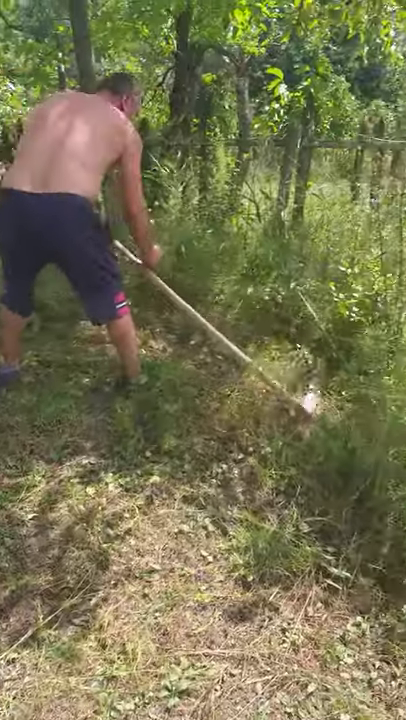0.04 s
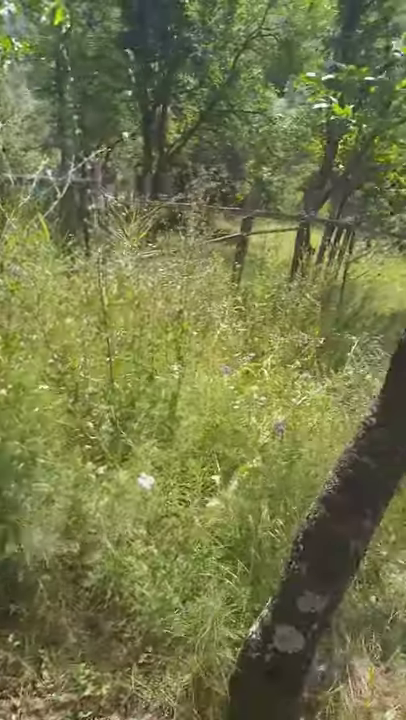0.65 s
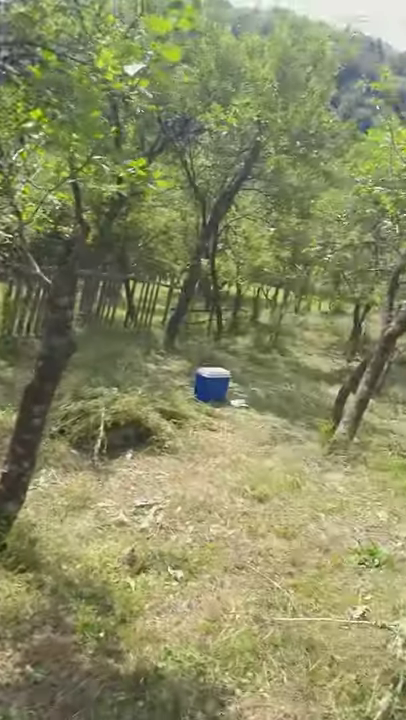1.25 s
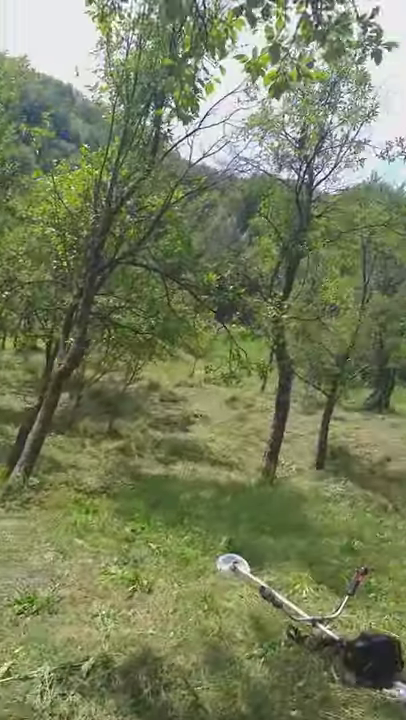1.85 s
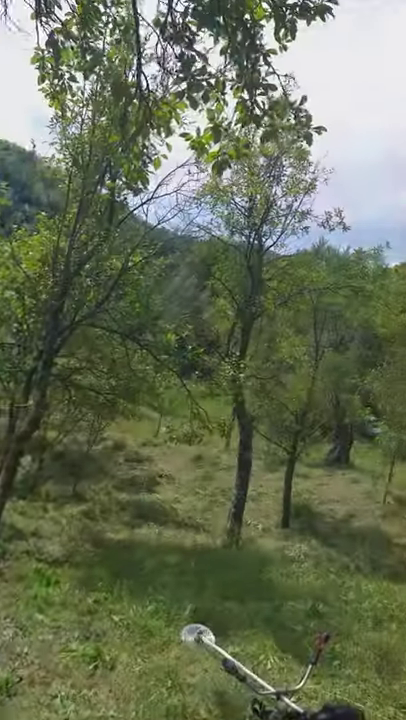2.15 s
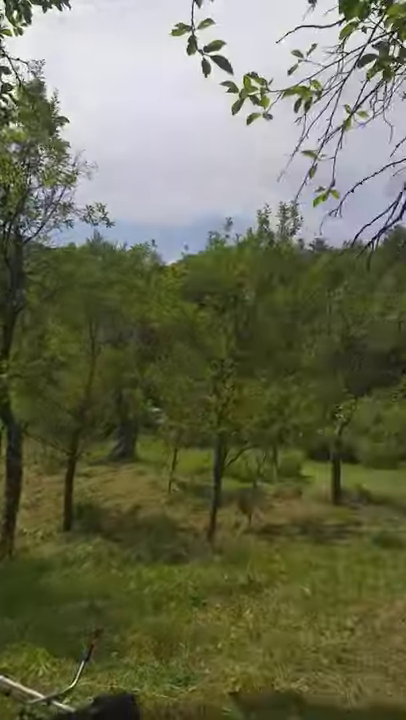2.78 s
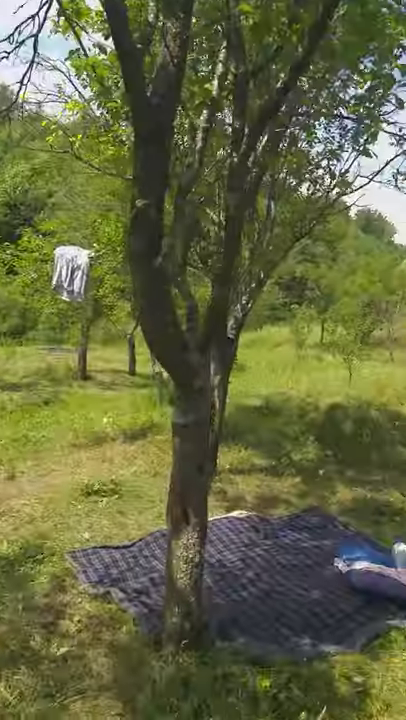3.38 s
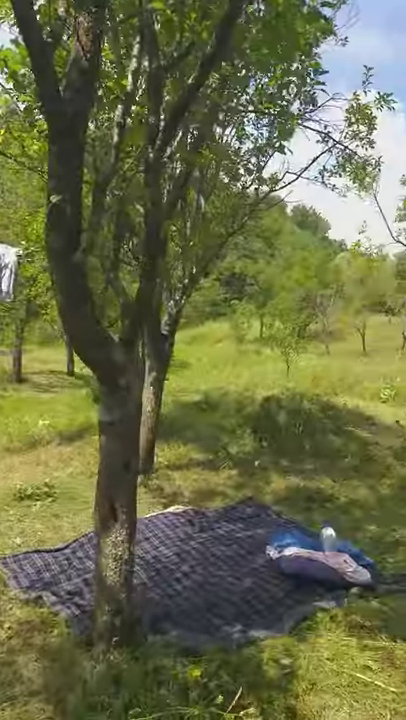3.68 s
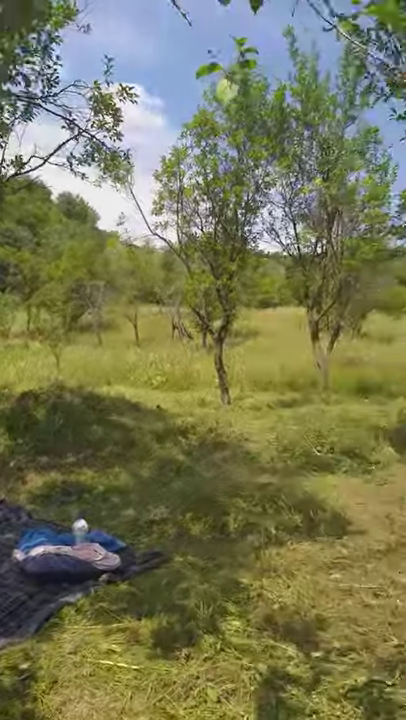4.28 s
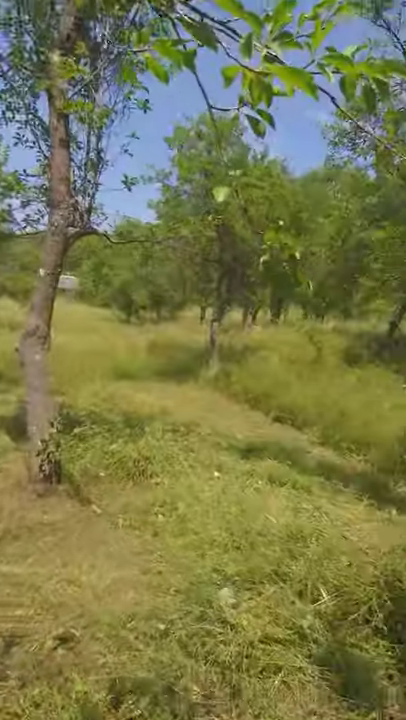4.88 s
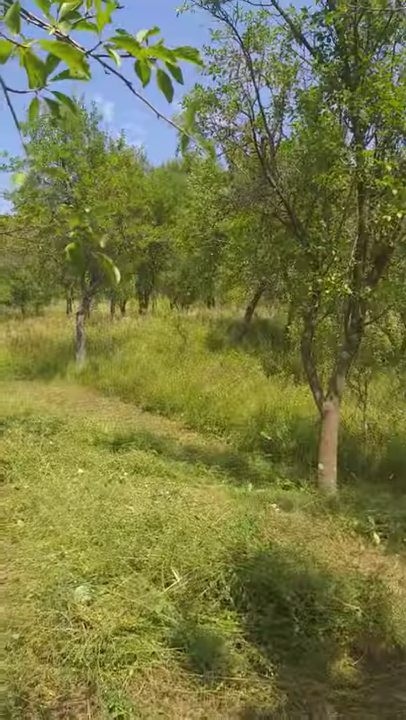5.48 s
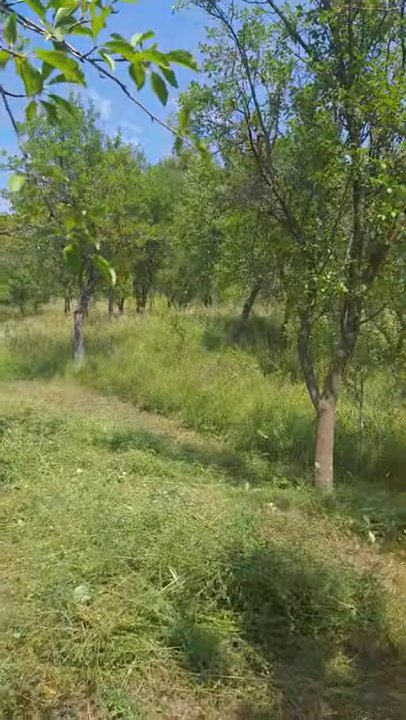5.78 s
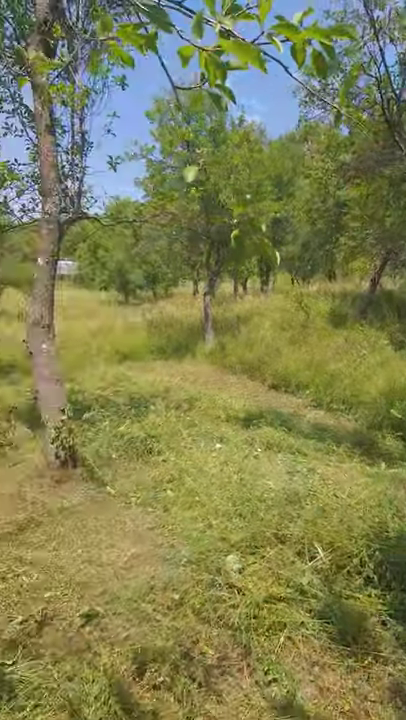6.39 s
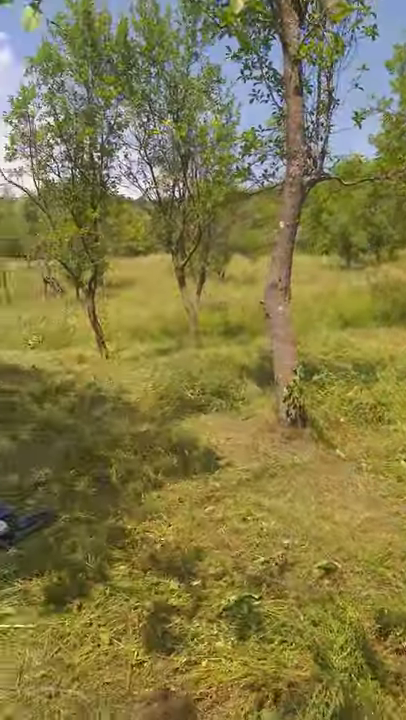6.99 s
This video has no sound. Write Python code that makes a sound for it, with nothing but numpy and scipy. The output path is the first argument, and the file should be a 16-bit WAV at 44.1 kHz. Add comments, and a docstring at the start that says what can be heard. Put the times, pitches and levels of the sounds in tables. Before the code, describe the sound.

Out in an orchard, a nearby scythe opens with a brief steel ring while a faint, far engine dies away. The blade keeps sweeping through grass about every second and a half to two seconds, ripping stems, cracking dry stalks and giving small pings. Later strokes are softer. A thin sizzle of grasshoppers lies underneath, and low wind bumps hit the microphone now and then, with the biggest shortly before the end.

```python
"""A scythe mows tall orchard grass, close up: each sweep brushes leaves, tears stems, crunches hay
and sets the thin steel blade ringing. Tufts give way, dry stalks snap, brief pings ring out, and short
echoes off soil and trunks shift as the listener moves. Behind it, wind puffs on the microphone,
grasshoppers sizzle, and a far two-stroke engine winds down in the first second."""
import sys
import numpy as np
from scipy import signal
from scipy.fft import rfft, irfft
from scipy.io import wavfile
from scipy.ndimage import uniform_filter1d

SR = 44100
rng = np.random.default_rng(int(sys.argv[2]) if len(sys.argv) > 2 else 0)


def digitize_waveform(pressure):
    """Quantize a signal to 16-bit integers and store it at the path in sys.argv[1].

    Rows of a 2-D input are taken as channels; values are limited to [-1, 1].
    """
    field = np.atleast_2d(pressure).T
    bounded = np.clip(field, -1, 1)
    quanta = np.round(bounded * 32767).astype(np.int16)
    wavfile.write(sys.argv[1], SR, quanta)


N = 310464
T = np.arange(N) / SR
SLOW_T = T[::32]  # control rate for the envelopes

# EQ curves, each scaled to rms 1 in use: f/Hz, level/dB
MEADOW_EQ = [(30, -10), (100, -3), (300, -11.5), (1000, -12), (2000, -15), (5500, -29), (7000, -3),
             (8400, 6), (9400, -25.5), (12500, -6), (15800, -14)]  # still air, with grasshoppers near 8 kHz
ENGINE_EQ = [(60, -10.5), (120, 5), (240, -13), (450, -31), (580, 6.5), (720, -3), (850, -1), (960, 3.5),
             (1100, -34), (1450, -4.5), (3000, -31)]  # hollow exhaust drone
WIND_EQ = [(15, -38.5), (28, -26), (45, -8), (85, 2.5), (140, -1.5), (220, -18), (350, -25.5), (700, -55)]  # low rumble on the microphone
HAY_EQ = [(100, -23), (230, -8.5), (330, -10.5), (460, -11), (640, -5), (850, 1), (1150, -2), (1500, -17),
          (2500, -29)]  # dull crunch of crushed hay
STEM_EQ = [(700, -58.5), (1200, -3), (1600, 4), (1850, 8.5), (2150, 6.5), (2500, 0.5), (3500, 3.5),
           (6000, -44)]  # midrange rip of stems
LEAF_EQ = [(1500, -24.5), (2600, -6), (3500, 5), (4400, 0.5), (5300, 1.5), (6200, -5), (8000, -27)]  # bright rustle of leaves
SEED_EQ = [(5000, -32.5), (6400, -1.5), (7300, 6), (8500, 4), (9600, -7), (11000, -25.5)]  # hiss of seed heads
TIP_EQ = [(8500, -35), (10000, -10.5), (11500, -2), (12600, -0.5), (14500, -4.5), (15700, -4)]  # airy fizz of the finest tips
# the far engine winds down: t/s, firing rate/Hz, level/dB
ENGINE_RUNDOWN = [(0, 120.5, -56.5), (.15, 121.7, -60.5), (.3, 113.9, -65), (.45, 104.8, -64),
                  (.6, 101.7, -69), (.9, 99, -84.5), (1.3, 103.8, -112)]
# gusts on the microphone: centre t/s, half length/s, level/dB
WIND_GUSTS = [(0.174, 0.085, -50.5), (0.447, 0.077, -59), (0.886, 0.18, -76), (1.596, 0.18, -52.5),
              (2.39, 0.52, -55), (3.57, 0.054, -57), (4.05, 0.061, -67), (5.45, 0.1, -59),
              (6.05, 0.1, -49.5), (6.299, 0.043, -40), (6.88, 0.028, -62)]
# single eddies hit the microphone port: t/s, level/dB, f/Hz
WIND_EDDIES = [(0.176, -39, 90), (1.587, -38, 121), (3.76, -45, 79.5), (5.401, -43, 85),
               (5.452, -36.5, 100), (5.486, -40.5, 91), (6.211, -37, 100), (6.267, -32, 146),
               (6.279, -35, 128), (6.306, -20.5, 179), (6.318, -30, 100)]
# dry stalks snap: t/s, level/dB, f/Hz
STALK_SNAPS = [(0.201, -22, 1740), (.6748, -31, 5000), (0.862, -10, 2270), (1.353, -25, 5600),
               (1.534, -22.5, 1730), (1.6105, -21, 1820), (2.5923, -21, 1990), (2.7099, -14, 2054),
               (3.753, -28, 2010), (4.1665, -46.5, 1870), (5.114, -19, 1710), (5.351, -25, 3670)]
# short pings and clinks, the low, longer ones from the steel blade: t/s, level/dB, f/Hz, t60/s
PINGS_AND_CLINKS = [(.675, -27.5, 5050, 0.081), (1.936, -25, 3930, 0.1), (3.486, -35.5, 1432, 0.3),
                    (3.649, -41, 1694, 0.43), (4.259, -55, 1310, 0.34)]
# tufts give way: t/s, level/dB, f/Hz, decay time constant/s
TUFT_TEARS = [(0.05, -29, 2400, 0.019), (.088, -32, 2370, 0.0096), (0.159, -28, 7500, 0.016),
              (0.197, -26.5, 2140, 0.019), (.674, -28, 5000, 0.026), (.764, -25, 2500, 0.08),
              (0.861, -15, 2100, 0.022), (0.916, -18, 2180, 0.038), (0.957, -20.5, 4080, 0.0062),
              (1.006, -26, 1200, 0.016), (1.41, -30, 7160, 0.019), (1.537, -27.5, 1620, 0.0041),
              (1.609, -29, 2000, .004), (1.881, -23, 1620, 0.017), (1.935, -30, 3850, 0.012),
              (2.473, -35.5, 2340, 0.011), (2.579, -14, 2080, 0.0047), (2.591, -14, 1990, 0.0058),
              (2.65, -18.5, 1920, 0.014), (2.709, -12, 2130, 0.0075), (2.787, -17, 1800, 0.012),
              (3.648, -38, 1550, 0.065), (3.864, -28.5, 2120, 0.031), (4.258, -56, 1890, 0.11),
              (4.334, -38, 1980, 0.037), (4.431, -26.5, 2780, 0.035), (4.433, -31, 7300, 0.018),
              (4.65, -33, 3120, 0.068), (5.256, -47, 1820, 0.025), (5.976, -25, 1620, 0.0095),
              (6.022, -44, 835, 0.0062)]
# scraping swishes: centre t/s, half length/s, centre f/Hz, level/dB
BLADE_SWISHES = [(0.98, 0.04, 1490, -58), (2.813, .04, 1714, -31.5), (3.489, .02, 1484, -38),
                 (4.752, 0.054, 1354, -45), (6, 0.039, 1000, -36), (6.66, .03, 880, -73)]
# modes of the steel blade: f/Hz, level/dB, t60/s
BLADE_MODES = [(1490, -31, 0.2), (1688, -10, 0.17), (1940, -2.5, 0.12), (2121, 0, 0.11), (2400, -5, 0.13),
               (2485, -14.5, 0.04), (2830, -10.5, 0.079), (3600, -20, .1), (3870, -6.5, 0.068),
               (4830, -11.5, .08)]
# the blade knocks against something hard: t/s, level/dB
BLADE_KNOCKS = [(3.485, -41.5), (3.866, -51.5)]
# the blade bites into thick clumps near the ground: t/s, stem level/dB, hay level/dB
CLUMP_BITES = [(0.205, -38.5, -50.5), (0.959, -31, -37.5), (1.56, -50, -47.5), (2.71, -29.5, -42),
               (2.82, -44, -42), (3.49, -39.5, -52.5), (3.67, -43.5, -56), (3.91, -43.5, -61.5),
               (4.41, -48, -48), (4.55, -60, -55), (4.72, -40.5, -56), (5.27, -65.5, -61.5),
               (6.023, -34.5, -36.5), (6.65, -54.5, -56.5), (6.8, -45, -85), (6.87, -50.5, -83)]
# cuts about every 1.7 s, drags back between them, and second pushes where a stroke catches:
# t/s, attack/s, hold/s, leaf level/dB, then offsets from it: stems/dB, seeds/dB, tips/dB, ring/dB
SCYTHE_STROKES = [(-.05, 0.1, 0.15, -39.5, -27, -5, -6, 1), (0.363, 0.43, 0.26, -34.5, -1.5, -2, -0.5, -5),
                  (0.974, 0.69, .48, -40.5, -2, -3.5, -2.5, -16.5),
                  (2.436, 0.089, .005, -42.5, -2, -5.5, -1, -15),
                  (2.561, 0.033, 0.25, -31, -0.5, -6, 1.5, -14.5),
                  (3.025, 0.23, 0.34, -46.5, -6.5, -0.5, -3, -17),
                  (3.546, 0.16, 0.08, -43.5, -13, -2, -4, -7),
                  (4.316, 0.021, 0.25, -43.5, 1.5, -2, -7, -17),
                  (4.343, 0.41, .11, -42, -11, 3.5, 1.5, -27), (4.871, 0.41, 0.22, -53, -5.5, 0, -3.5, -16),
                  (5.883, 0.067, 0.15, -40.5, -7.5, -2.5, -2.5, -23.5),
                  (6.124, .54, .26, -51.5, -16, 3, -1, -11)]


def undb(db):
    """Decibels to gain."""
    return np.exp(np.asarray(db) * (np.log(10) / 20))


def unit(x):
    """Scale to rms 1."""
    return x / np.sqrt(np.mean(x ** 2))


def colour(x, eq):
    """Minimum-phase EQ through (f/Hz, level/dB) points; the result has rms 1."""
    hz, db = np.transpose(eq)
    bin_hz = np.arange(N // 2 + 1) * SR / N
    log_gain = np.log(undb(np.interp(np.log(bin_hz + 1), np.log(hz), db)))
    cepstrum = irfft(log_gain, N)
    cepstrum[1:N // 2] *= 2
    cepstrum[N // 2 + 1:] = 0
    return unit(irfft(rfft(x) * np.exp(rfft(cepstrum)), N))


def resonance(x, hz, width_hz):
    """Two-pole band-pass, gain 1 at the centre."""
    return signal.lfilter(*signal.iirpeak(hz, hz / min(width_hz, SR / 4), fs=SR), x)


def walk(rate):
    """Random modulator that glides to a new value every 1 / rate s; rms 1."""
    hold = max(int(SR / rate), 1)
    return unit(uniform_filter1d(rng.standard_normal(N)[np.arange(N) // hold], hold))


def crackle(rate, spread_db):
    """Tiny random breaks, about rate a second, most weak and a few strong; rms 1."""
    size = undb(spread_db * np.minimum(rng.standard_exponential(N), 5))
    return unit((rng.random(N) < rate / SR) * size * rng.choice([-1, 1], N))


def add(out, s, sound):
    """Mix a short sound in at time s."""
    start = max(int(s * SR), 0)
    out[start:start + len(sound)] += sound[:N - start]


def power_sum(gains):
    """Add control-rate envelopes in power and bring them up to audio rate."""
    return np.interp(T, SLOW_T, np.sqrt(sum(g ** 2 for g in gains)))


def swells(times, levels_db, rise_db_per_s=292, fall_db_per_s=202):
    """Envelope that climbs to each level at its time, then dies away."""
    return power_sum(
        undb(db - rise_db_per_s * np.maximum(s - SLOW_T, 0) - fall_db_per_s * np.maximum(SLOW_T - s, 0))
        for s, db in zip(times, levels_db))


def mowing(levels_db, settle_db_per_s):
    """One layer's envelope over all strokes: the blade speeds up evenly, sweeps on, the sound settles."""
    gains = []
    for (s, attack_s, hold_s, *_), db in zip(SCYTHE_STROKES, levels_db):
        speed = np.clip((SLOW_T - s) / attack_s, 0, 1)
        settling_s = np.maximum(SLOW_T - s - attack_s - hold_s, 0)
        gains.append(speed ** 1.88 * undb(db - settle_db_per_s * settling_s))
    return power_sum(gains)


def meadow(level_db=-62.5):
    """The bed: still air and a faintly flickering chorus of grasshoppers."""
    return colour(rng.standard_normal(N), MEADOW_EQ) * undb(level_db + 0.43 * walk(36))


def engine():
    """One exhaust pulse per turn, slowing as the throttle closes; the air makes it waver."""
    times, hz, db = np.transpose(ENGINE_RUNDOWN)
    firing_hz = np.interp(T, times, hz) * (1 + 0.0033 * walk(27))
    pulses = np.diff(np.floor(np.cumsum(firing_hz) / SR), prepend=0)
    return colour(pulses - pulses.mean(), ENGINE_EQ) * undb(np.interp(T, times, db) + walk(24))


def wind(breeze_db=-78, eddy_cycles=0.53):
    """Uneven low buffeting, with single eddies that push and pull on the microphone port."""
    gusts = sum(undb(db) * np.exp(-((T - s) / half_s) ** 2) for s, half_s, db in WIND_GUSTS)
    buffeting = unit(colour(rng.standard_normal(N), WIND_EQ) * undb(6.2 * np.tanh(walk(36))))
    out = buffeting * (undb(breeze_db) + gusts)
    for s, db, hz in WIND_EDDIES:
        turn = (T - s) * hz
        near = np.abs(turn) < 4
        out[near] += undb(db) * np.sin(2 * np.pi * turn[near]) * np.exp(-(turn[near] / eddy_cycles) ** 2)
    return out


def ground_echoes(x, near_s=0.0022, far_s=0.0075, near_gain=0.27, far_gain=0.3, drift=0.0916):
    """Soil and trunks send back short echoes, a comb filter that drifts as the listener moves."""
    near, far = (np.interp(T - lag * (1 + drift * walk(1.5)), T, x) for lag in (near_s, far_s))
    return (x + near_gain * near + far_gain * far) / np.sqrt(1 + near_gain ** 2 + far_gain ** 2)


def snaps(cycles=0.92, splinter_s=0.00032):
    """A dry stalk breaks with a cycle or two of ring and a short burst of splinters."""
    out, t = np.zeros(N), T[:SR // 50]
    hiss = colour(rng.standard_normal(N), LEAF_EQ) + colour(rng.standard_normal(N), SEED_EQ) / 2
    splinters = 0.45 * np.tanh(hiss)
    for s, db, hz in STALK_SNAPS:
        age = hz * t / cycles
        ring = np.sin(2 * np.pi * hz * t) * 2 * age * np.exp(1 - 2 * age)
        burst = splinters[int(s * SR):][:len(t)] * np.exp(-t / splinter_s)
        add(out, s, undb(db) * (ring + burst))
    return signal.sosfilt(signal.butter(1, 300, "high", fs=SR, output="sos"), out)


def pings(waver=0.006):
    """Short pings and clinks, each on one wavering pitch; the low, longer ones are the blade ringing."""
    out, t = np.zeros(N), T[:SR // 3]
    wobble = 1 + waver * walk(200)
    for s, db, hz, t60 in PINGS_AND_CLINKS:
        turns = np.cumsum(hz * wobble[int(s * SR):][:len(t)]) / SR
        add(out, s, undb(db - 60 * t / t60) * np.sin(2 * np.pi * turns))
    return out


def tufts(body_db=-5, crisp_db=-8, relative_width=0.34, attack_s=0.001):
    """Each tuft tears in a fading volley of breaks: a broad stem body with a crisp leafy edge."""
    out, t = np.zeros(N), T[:SR // 5]
    breaks = crackle(rate=9000, spread_db=4)
    crisp = colour(breaks, LEAF_EQ) + 0.5 * colour(breaks, SEED_EQ) + 0.59 * colour(breaks, TIP_EQ)
    for s, db, hz, decay_s in TUFT_TEARS:
        part = slice(int(s * SR), int(s * SR) + len(t))
        width_hz = relative_width * hz
        body = unit(resonance(resonance(breaks[part], hz, width_hz), hz, 2 * width_hz))
        envelope = (1 - np.exp(-t / attack_s)) * np.exp(-t / decay_s)
        add(out, s, undb(db) * envelope * (undb(body_db) * body + undb(crisp_db) * crisp[part]))
    return out


def stalks(rate, lo_hz, hi_hz, cycles, spread_db):
    """Each touched stalk rings briefly at a pitch of its own; rms 1."""
    out, t = np.zeros(N), T[:SR // 16]
    for when, pitch, size in rng.random((int(rate * N / SR), 3)):
        hz = lo_hz * (hi_hz / lo_hz) ** pitch
        ring = np.sin(2 * np.pi * hz * t) * np.exp(-hz * t / cycles)
        add(out, when * N / SR, undb(spread_db * size) * ring)
    return unit(out)


def swishes(sink=0.3, grain_hz=170):
    """A narrow scraping resonance swells and fades, sinking in pitch as the swing slows."""
    out = np.zeros(N)
    grain = unit(signal.sosfilt(signal.butter(2, grain_hz, fs=SR, output="sos"), rng.standard_normal(N)))
    for s, half_s, hz, db in BLADE_SWISHES:
        part = np.abs(T - s) < 3 * half_s
        progress = (T[part] - s) / half_s
        glide = np.sqrt(2) * np.sin(2 * np.pi * np.cumsum(hz * np.exp(-sink * progress)) / SR)
        out[part] += undb(db) * np.exp(-progress ** 2) * grain[part] * glide
    return out


def blade(sing_hz=2099, sing_db=-42, lift_s=0.2, sing_t60=0.19):
    """Drumming stalks and hard knocks ring the thin steel; an opening scrape makes its main mode sing."""
    strikes = crackle(rate=2700, spread_db=3.5)
    ring = sum(undb(db) * unit(resonance(strikes, hz, np.log(1000) / np.pi / t60))
               for hz, db, t60 in BLADE_MODES)
    leaf_db, *_, ring_db = np.transpose(SCYTHE_STROKES)[3:]
    stroked = mowing(leaf_db + ring_db, settle_db_per_s=71)
    knocked = swells(*np.transpose(BLADE_KNOCKS), rise_db_per_s=3000, fall_db_per_s=105)
    sing = unit(np.sin(2 * np.pi * np.cumsum(sing_hz * (1 + 0.005 * walk(120))) / SR))
    fade_db = -60 * np.maximum(T - lift_s, 0) / sing_t60  # rings out once the blade lifts
    return unit(ring) * np.hypot(stroked, knocked) + sing * undb(sing_db + fade_db + 1.5 * walk(102))


def grass_cut(tip_boost_db=2.5, hay_under_stems_db=-19.5):
    """The scythe brushes leaves in fine grains, tears stems in coarser ones and crunches hay below."""
    leaf_db, stem_db, seed_db, tip_db, _ = np.transpose(SCYTHE_STROKES)[3:]
    bite_times, bite_db, crush_db = np.transpose(CLUMP_BITES)
    leaf_gain = mowing(leaf_db, settle_db_per_s=85)
    seed_gain = mowing(leaf_db + seed_db, settle_db_per_s=67.5)
    tip_gain = mowing(leaf_db + tip_db + tip_boost_db, settle_db_per_s=84.5)
    tearing = mowing(leaf_db + stem_db, settle_db_per_s=115.5)
    stem_gain = np.hypot(tearing, swells(bite_times, bite_db))
    hay_gain = np.hypot(tearing * undb(hay_under_stems_db), swells(bite_times, crush_db))
    catch = walk(55)  # all layers catch and slip together
    breaks = crackle(rate=2200, spread_db=3.5)
    brush = unit(crackle(rate=14000, spread_db=0.5) + 0.77 * breaks)
    thin = stalks(rate=140, lo_hz=2627, hi_hz=6034, cycles=72, spread_db=8)
    thick = stalks(rate=130, lo_hz=1374, hi_hz=2478, cycles=41, spread_db=16)
    leaves = unit(colour(brush, LEAF_EQ) + 0.5 * thin) * leaf_gain
    seeds = colour(brush, SEED_EQ) * seed_gain
    tips = colour(crackle(rate=27000, spread_db=4.5), TIP_EQ) * tip_gain
    stems = unit(colour(breaks + 0.48 * rng.standard_normal(N), STEM_EQ) + 0.29 * thick) * stem_gain
    hay = colour(crackle(rate=1600, spread_db=3), HAY_EQ) * hay_gain
    return (leaves + seeds + tips) * undb(1.15 * catch) + (stems + hay) * undb(1.9 * catch)


def scene(stems_left=0.18, tips_right=0.015, seed_width=0.16):
    """A near-mono mix: the stem band leans left, the tips a hair right, the seed hiss is widened."""
    scythe = ground_echoes(grass_cut()) + swishes() + blade() + tufts() + pings() + snaps()
    mid = scythe + wind() + engine() + meadow()
    stem_band = signal.sosfiltfilt(signal.butter(3, [1300, 2200], "band", fs=SR, output="sos"), mid)
    tip_band = resonance(mid, 13600, 900)
    seed_band = resonance(resonance(mid, 8500, 1500), 8500, 1500)
    side = stems_left * stem_band - tips_right * tip_band
    side += seed_width * np.gradient(seed_band)  # a quarter-cycle shift skews left and right in phase
    return np.array([mid + side, mid - side])


def record(dry, low_cut_hz=38, high_cut_hz=15800):
    """A gentle low cut takes out the deepest rumble, a steep high cut the very top."""
    dry = signal.sosfilt(signal.butter(2, low_cut_hz, "high", fs=SR, output="sos"), dry)
    return signal.sosfilt(signal.ellip(10, 0.2, 80, high_cut_hz, fs=SR, output="sos"), dry)


dry = scene()
out = record(dry)
digitize_waveform(out)
```